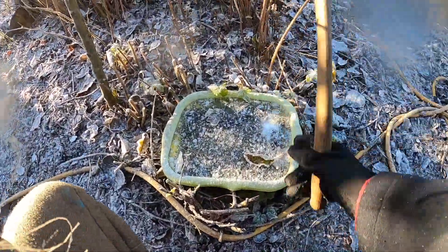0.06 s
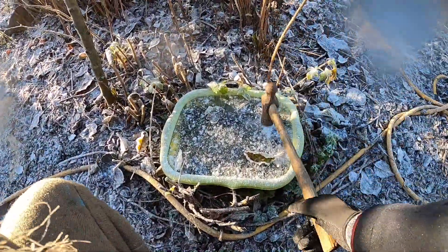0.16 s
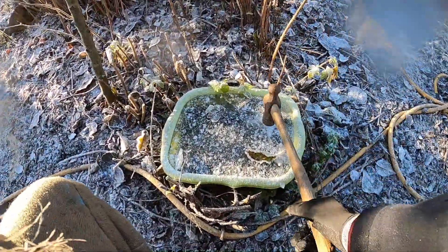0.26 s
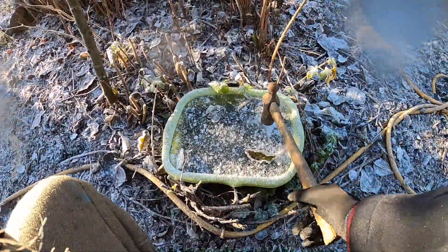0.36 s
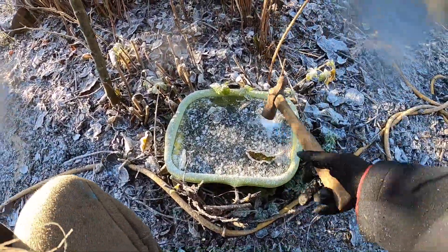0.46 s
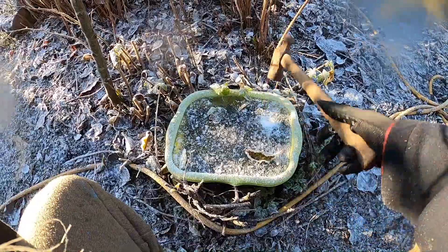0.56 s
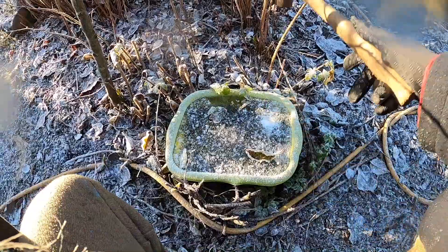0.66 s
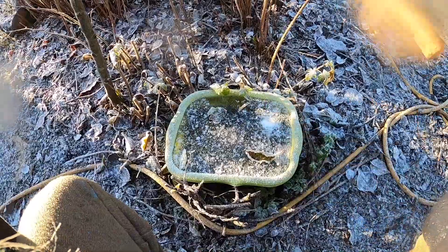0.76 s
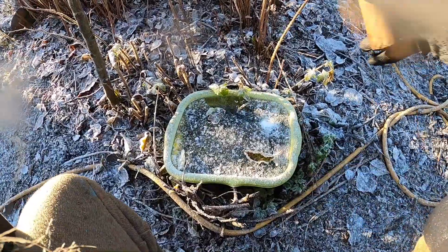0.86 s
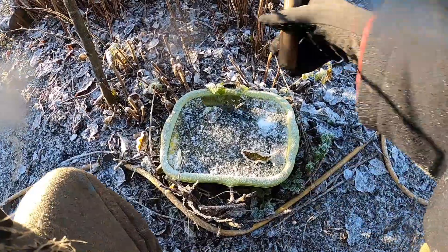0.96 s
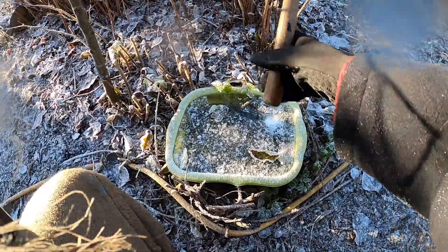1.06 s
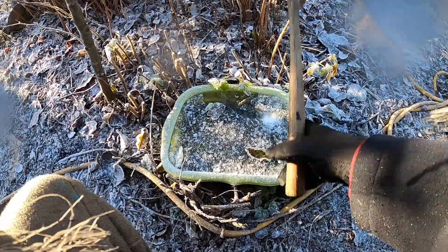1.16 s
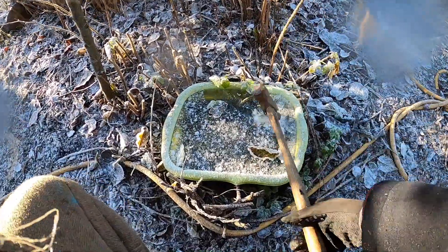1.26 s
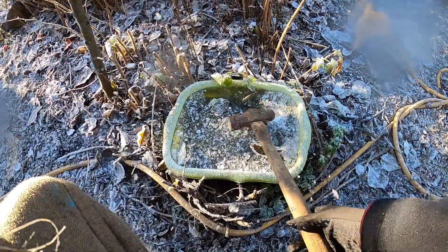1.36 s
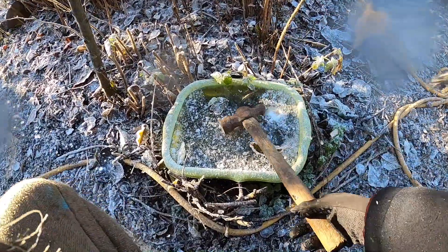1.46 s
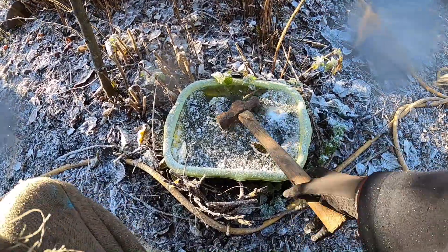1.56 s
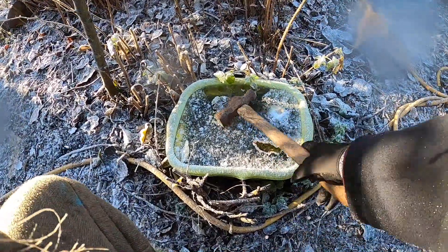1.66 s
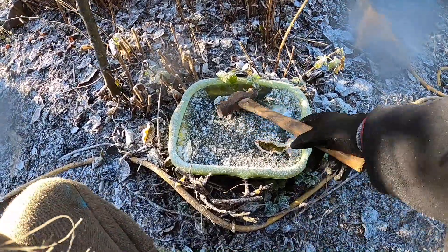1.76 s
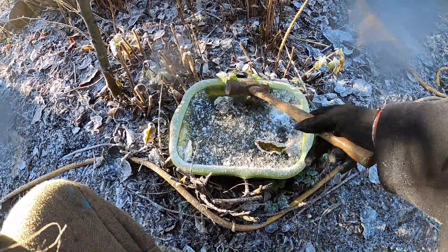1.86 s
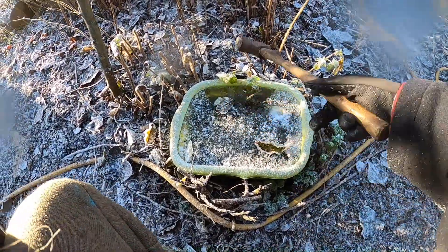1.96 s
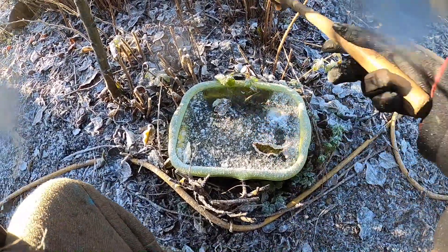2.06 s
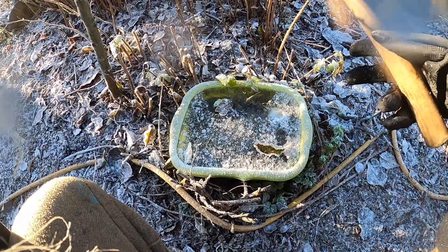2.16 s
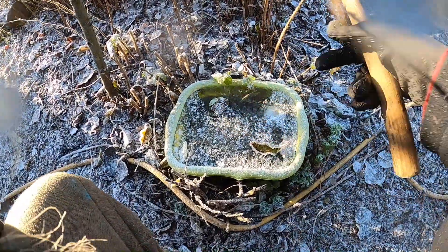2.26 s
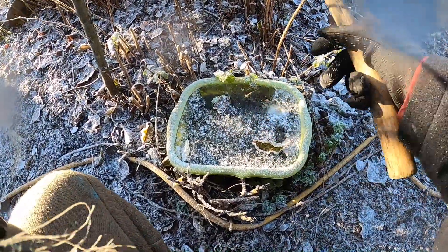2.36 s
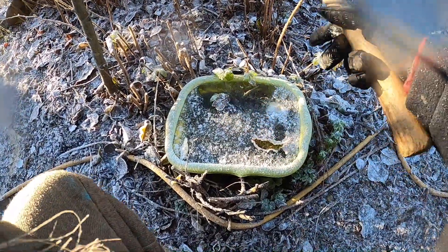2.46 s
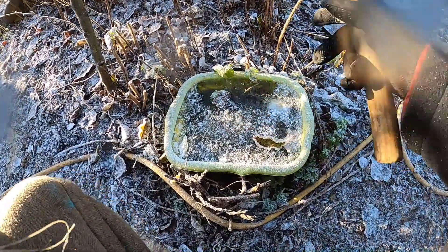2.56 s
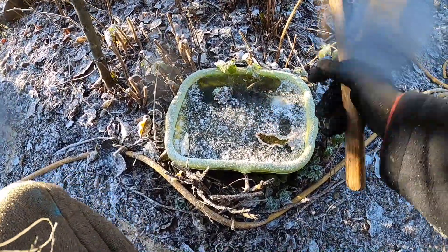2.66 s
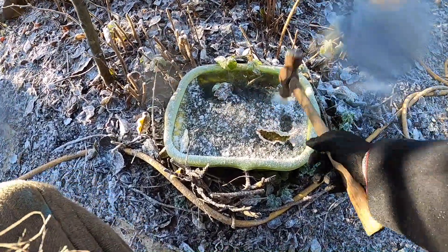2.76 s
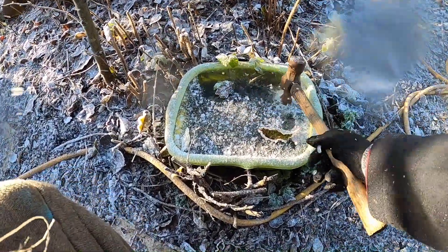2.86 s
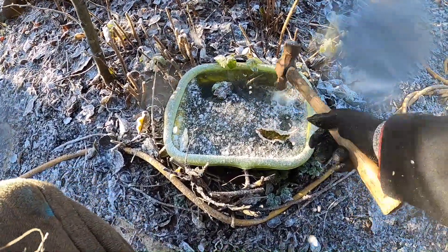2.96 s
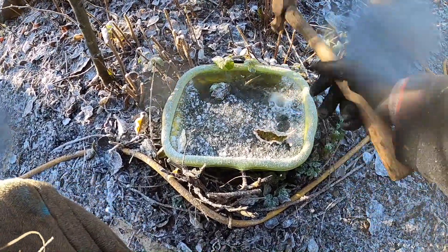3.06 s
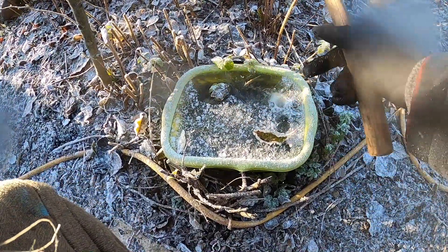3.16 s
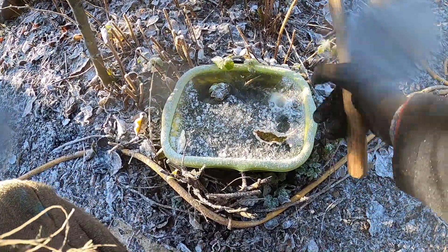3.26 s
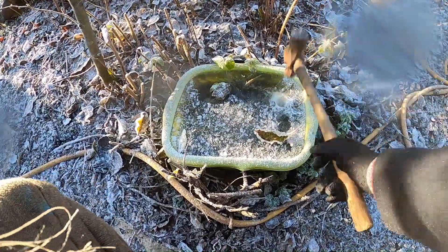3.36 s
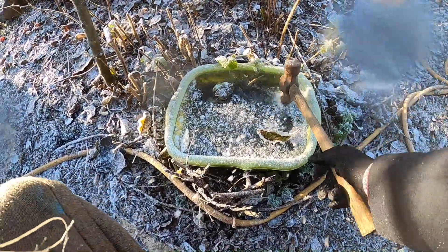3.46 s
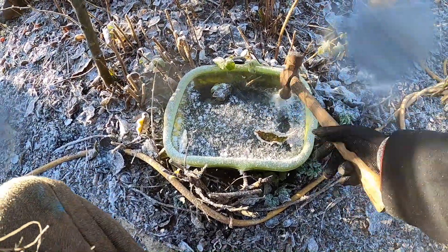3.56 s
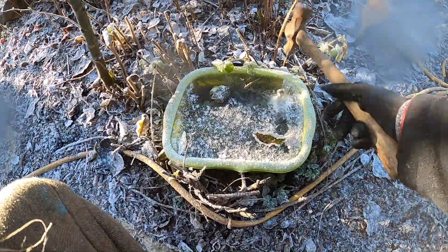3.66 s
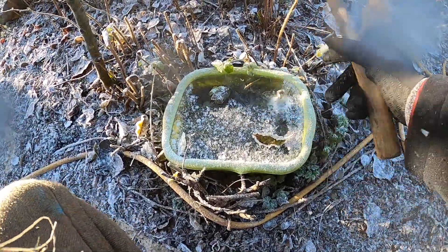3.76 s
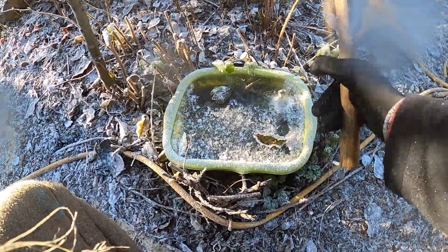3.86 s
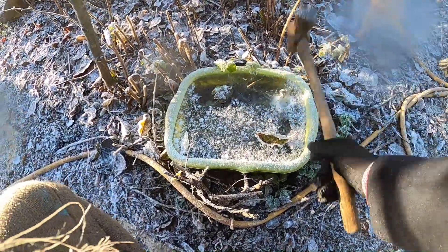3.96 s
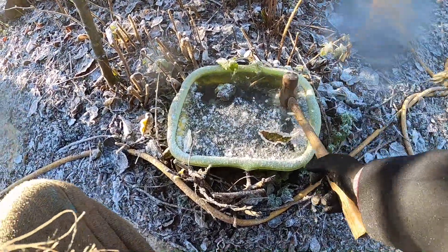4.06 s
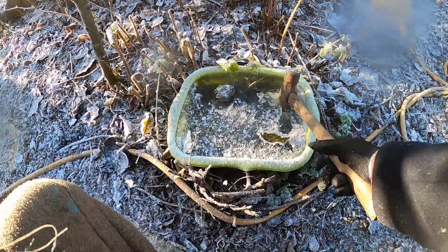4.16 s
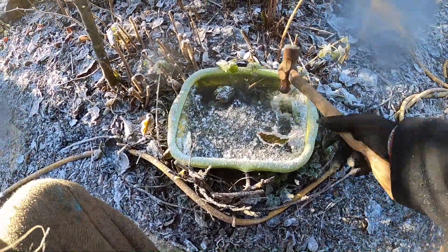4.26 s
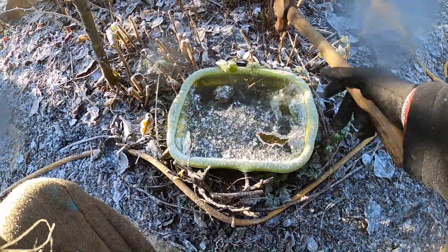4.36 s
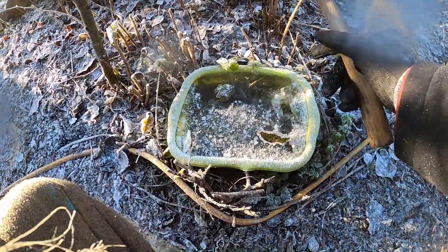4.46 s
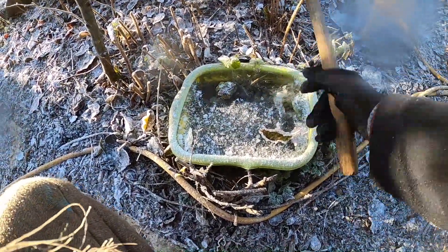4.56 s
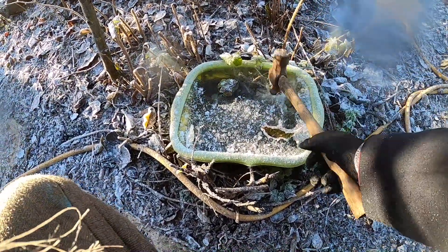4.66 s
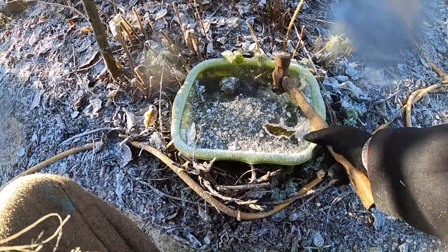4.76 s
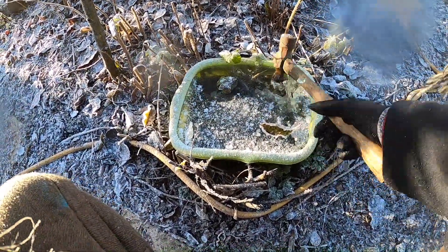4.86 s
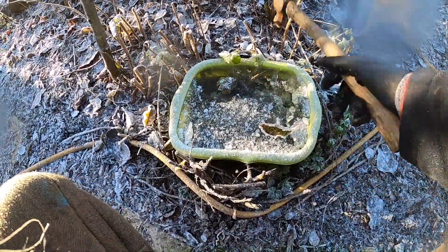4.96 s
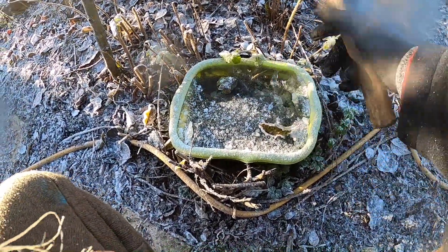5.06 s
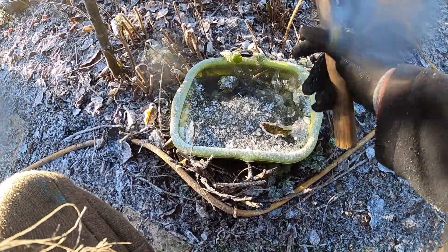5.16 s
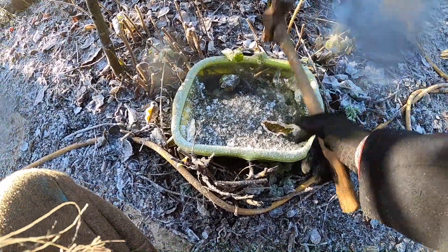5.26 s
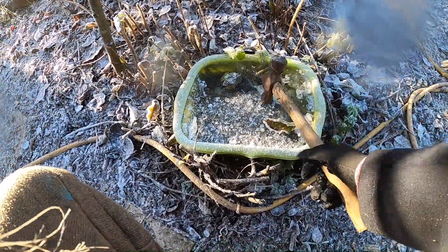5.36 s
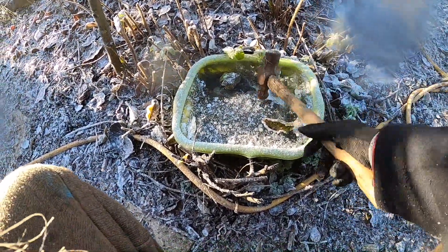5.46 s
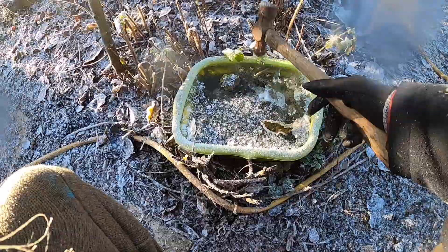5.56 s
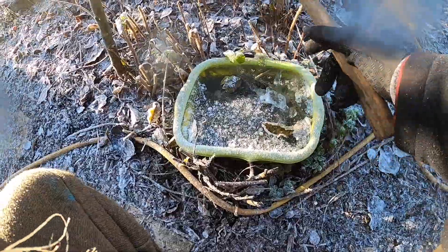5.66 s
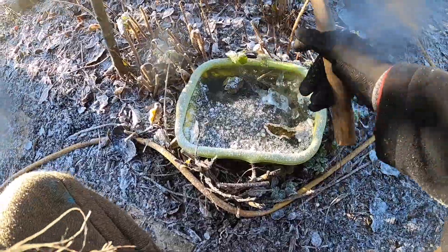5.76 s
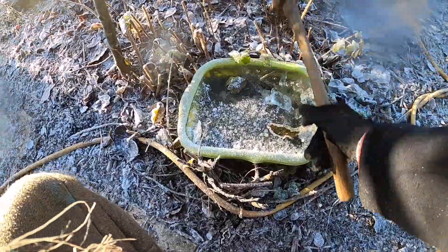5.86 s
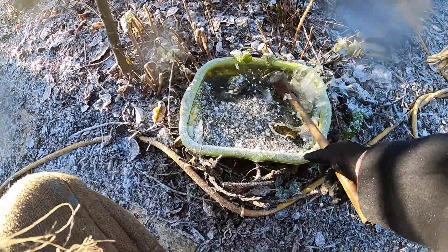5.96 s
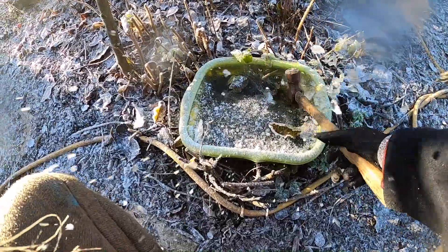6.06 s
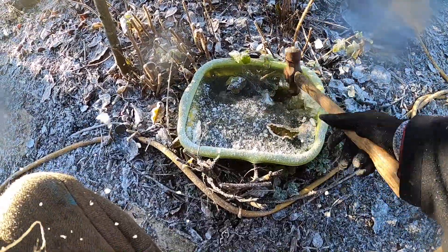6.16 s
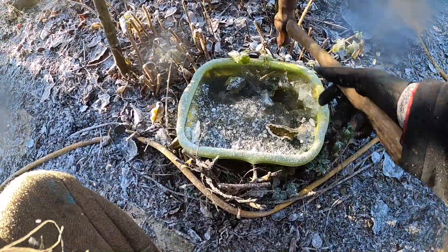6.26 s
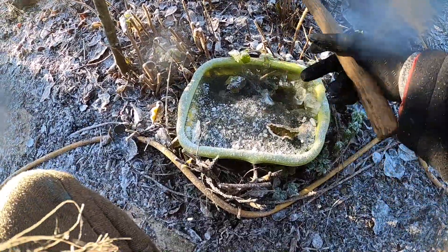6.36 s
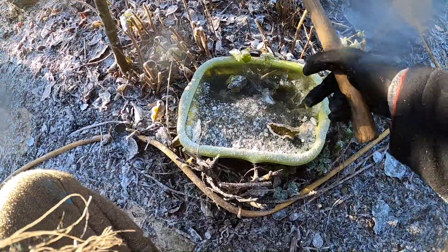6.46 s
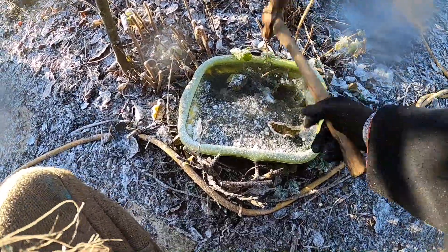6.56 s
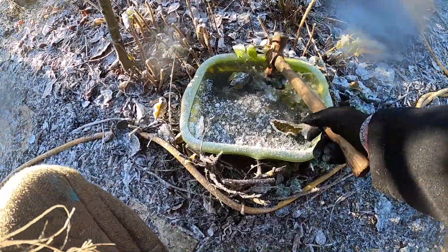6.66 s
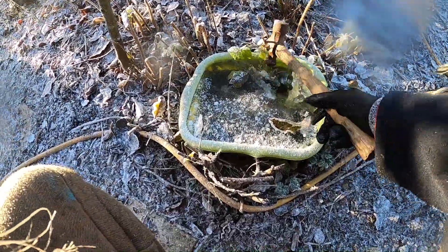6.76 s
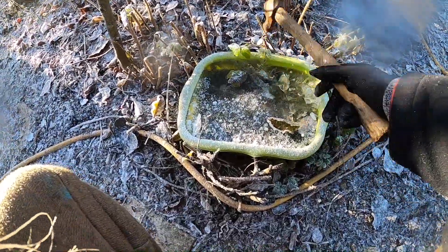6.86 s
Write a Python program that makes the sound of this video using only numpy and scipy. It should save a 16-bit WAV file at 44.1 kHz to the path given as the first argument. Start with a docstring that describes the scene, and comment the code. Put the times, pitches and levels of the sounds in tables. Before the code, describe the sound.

Spaced hammer blows on a frozen bowl give bright cracks and hollow thuds, then the ice breaks wetly amid tinkling shards and low outdoor rumble.

```python
"""Hammer on ice in a plastic bowl

Outdoors, close to a two-port microphone, a hammer strikes a sheet of ice. Each blow is a falling bending
tone, a noisy crack, a shard's ring, loose rattle and the bowl's dying tones. Short rings and clicks make
chips, tone pairs make knocks and ringing ice pieces, gated noise and grains make bursts of ice dust and
shards, slush and quiet smooth rustles, perhaps of a sleeve. One faint squeak bends upward. A far engine,
built from sine waves, hums over filtered noise: a low outdoor wash."""
import sys
import numpy as np
from scipy import signal
from scipy.fft import rfft, irfft, next_fast_len
from scipy.io import wavfile
from scipy.ndimage import uniform_filter1d

SR = 44100
rng = np.random.default_rng(int(sys.argv[2]) if len(sys.argv) > 2 else 0)


def bounce(signal):
    """Save signal as a 16-bit WAV file at the path given by the first command-line argument."""
    frames = np.transpose(np.atleast_2d(signal))
    limited = np.clip(frames, -1, 1)
    pcm = np.round(limited * 32767).astype(np.int16)
    wavfile.write(sys.argv[1], SR, pcm)


N = 304949

# colour of the fizzing noise in chip clicks, crackles and rustles: (frequency [Hz], level [dB])
FIZZ_COLOUR = [(300, -37), (710, -5), (1200, 5.5), (1530, -24), (2240, -1), (4040, 0), (6120, -6.5),
               (7380, -11.5), (8410, -11), (11800, -24), (15300, -52), (16400, -52.5)]


def gain_of(db):
    """Turns decibels into a factor for the wave's size."""
    return 10 ** (np.asarray(db) / 20)


def evened(x):
    """Scales a sound to an average strength (rms) of 1."""
    return x / np.sqrt(np.mean(x ** 2) + 1e-20)


def read(points, hz):
    """Reads a spectrum between its points, on a log pitch axis."""
    f, value = np.transpose(points)
    return np.interp(np.log(hz + 1), np.log(f + 1), value)


def curve(rows):
    """Draws each column of a timed table as a line, sample by sample."""
    s, *columns = np.transpose(rows)
    t = np.arange(N) / SR
    return [np.interp(t, s, column) for column in columns]


def add(mix, s, sound):
    """Lays a sound into the mix, starting at s seconds."""
    part = mix[round(s * SR):][:len(sound)]
    part += sound[:len(part)]


def colour(x, points):
    """Filters a sound by a spectrum in dB."""
    size = next_fast_len(len(x))
    gain = gain_of(read(points, np.fft.rfftfreq(size, 1 / SR)))
    return irfft(rfft(x, size) * gain, size)[:len(x)]


def flicker(span_s):
    """Random wavering of rms 1: noise smoothed twice over a span."""
    size = max(int(span_s * SR), 2)
    smoothed = uniform_filter1d(rng.standard_normal(N), size)
    return evened(uniform_filter1d(smoothed, size))


def ring(modes, t):
    """Adds up the natural tones of a struck body, each dying at its own speed."""
    return sum(gain_of(db - 60 * t / t60) * np.sin(2 * np.pi * hz * t) for hz, db, t60 in modes)


def bursts(rows, shares=1):
    """Loudness of overlapping bursts: quick rise, slanted hold, then one shared speed of dying."""
    rise_s, dies_db_per_s = 0.014, 549
    t = np.arange(N) / SR
    out = np.zeros(N)
    for (s, length, db, change_db), share in zip(rows, shares * np.ones(len(rows))):
        age = np.maximum(t - s, 0)
        slant_db = change_db * np.minimum(age / length, 1)
        fade_db = dies_db_per_s * np.maximum(age - length, 0)
        out += share * np.minimum(age / rise_s, 1) * gain_of(db + slant_db - fade_db)
    return out


def grains(per_s, lo_hz, hi_hz, cycles, spread_db, count):
    """Sparse bursts of a few slightly rising cycles, at scattered pitches and sizes."""
    happens = rng.random(N) < per_s / SR
    size = gain_of(spread_db * np.minimum(rng.exponential(1, N), 4)) * happens
    kind, out = rng.integers(0, count, N), np.zeros(N)
    for k, hz in enumerate(np.geomspace(lo_hz, hi_hz, count)):
        u = np.arange(int(3 * cycles * SR / hz)) * hz / SR  # time counted in cycles
        swell = u * np.exp(-2.5 * u / cycles)
        shape = swell * np.sin(2 * np.pi * u * (1 + u / 250))
        out += signal.oaconvolve(size * (kind == k), shape / np.linalg.norm(shape))[:N]
    return evened(out)


def blow(crack_db, bend_db, t60, boom_db, bowl_db, rattle_db, ring_hz, ring_db):
    """Bending waves arrive high first, low later; a crack and a shard's ring on top, the bowl beneath."""
    # colour of the crack noise: (frequency [Hz], level [dB])
    crack_colour = [(530, -79), (900, -41.5), (1890, -5), (2850, -1), (3380, 1), (4110, -0.5), (5050, -2.5),
                    (8610, -12.5), (9260, -18.5), (14200, -29.5), (16400, -68.5)]
    # colour of loose ice after a blow: (frequency [Hz], level [dB])
    rattle_colour = [(100, -16), (300, 4), (900, -16), (1500, -22.5), (4000, -26.5), (9000, -38.5),
                     (16000, -55)]
    # tones of the bowl: (frequency [Hz], relative level [dB], time to fall 60 dB [s])
    bowl_modes = [(139.4, -1.5, 0.13), (206.5, -10, 0.18), (310, -3, 0.092), (429, -25, 0.14),
                  (1000, 22.5, 0.0096)]
    # bowl on the ground: (frequency [Hz], relative level [dB], time to fall 60 dB [s])
    boom_modes = [(38.46, -18, 0.47), (56, 0.5, 0.065), (93.7, -4.5, 0.096)]
    bend_hz, slide_s, lag_s = 700, 0.002946, 0.0014  # first pitch, slide time, delay
    crack_t60, rattle_t60, shard_t60 = 0.013, 0.08, 0.012  # seconds to fall 60 dB

    t = np.arange(SR // 3) / SR
    late = np.maximum(t - lag_s, 0)  # the sheet gives way just after the first crack
    falling = np.sin(2 * np.pi * bend_hz * slide_s * np.log1p(late / slide_s))
    bend = falling * gain_of(bend_db - 60 * (late / t60) ** 1.34)
    noise = rng.standard_normal((2, len(t)))
    crack = evened(colour(noise[0], crack_colour)) * gain_of(crack_db - 60 * t / crack_t60)
    rattle = evened(colour(noise[1], rattle_colour)) * gain_of(rattle_db - 60 * t / rattle_t60)
    shard = ring([(ring_hz, ring_db, shard_t60)], t)
    bowl = gain_of(boom_db) * ring(boom_modes, t) + gain_of(bowl_db) * ring(bowl_modes, t)

    def rise(s):
        """Ramps up from silence in s seconds."""
        return np.minimum(t / s, 1)

    return bend * rise(0.0005) + (crack + shard) * rise(0.0017) + (rattle - bowl) * rise(0.0035)


def chip(db, hz, click_db):
    """A short ring that rises a little, with a click of wide noise."""
    t60 = 0.014  # seconds to fall 60 dB
    t = np.arange(2000) / SR
    dying = gain_of(-60 * t / t60)
    tone = np.sin(2 * np.pi * hz * t * (1 + 3 * t)) * dying * np.minimum(t / 0.0007, 1)
    noise = evened(colour(rng.standard_normal(len(t)), FIZZ_COLOUR))
    click = noise * gain_of(click_db) * dying * np.minimum(t / 0.0004, 1)
    return gain_of(db) * (tone + click)


def knock_or_ice_ring(db, hz):
    """A knock on the bowl or the steady ring of an ice piece: two tones that die together."""
    t60 = 0.035  # seconds to fall 60 dB
    t = np.arange(4000) / SR
    pair = np.sin(2 * np.pi * hz * t) + 0.32 * np.sin(2 * np.pi * 1.666 * hz * t)
    return gain_of(db - 60 * t / t60) * pair * np.minimum(t / 0.00053, 1)


def squeak(length, from_hz, to_hz, db):
    """A thin, slightly rough tone that swells and bends upward."""
    u = np.arange(0, length, 1 / SR) / length  # 0 at the start, 1 at the end
    roughness = 1 + 0.4 * uniform_filter1d(rng.standard_normal(len(u)), 60)
    hz = (from_hz + (to_hz - from_hz) * u) * roughness
    return gain_of(db) * np.sqrt(u) * np.sin(2 * np.pi * np.cumsum(hz) / SR)


def crackles_and_rustles():
    """Noise gated by many tiny fractures, each favouring one band, with ringing shards; smooth rustles."""
    # bursts of ice dust and shards, and quiet smooth rustles, perhaps of a sleeve: (start [s], length [s],
    # first level [dB], change over the length [dB], smooth share of the power [0-1])
    burst_rows = np.array([(.24, 0.22, -64, 8, 0.34), (0.475, 0.12, -55, -9, 0.7), (0.611, .16, -59, 3, .3),
                           (0.785, .11, -61, 4.5, 0.9), (.98, .1, -59, 1.5, 0.7),
                           (1.197, 0.12, -63, 1, 0.7), (1.341, 0.13, -56.5, 5.5, 1),
                           (1.49, 0.18, -56.5, 4, 0.37), (1.674, 0.3, -47, -14.5, 0.09),
                           (1.969, 0.053, -51, -6, 0), (2.14, 0.042, -55, -0.5, 0.77),
                           (2.24, 0.085, -63, 10.5, 0.97), (2.41, .3, -79, 18.5, 0.2),
                           (2.847, 0.15, -53, -7, 0.5), (3.146, 0.14, -54.5, 0.5, 0.08),
                           (3.293, .08, -60.5, 5.5, 0), (3.441, 0.21, -43, -12.5, 0.01),
                           (3.69, 0.19, -50, 1, 0.14), (4.075, 0.21, -44, -1.5, .8),
                           (4.218, 0.17, -45, -18, 0.9), (4.37, 0.043, -48.5, 2.5, 0.52),
                           (4.428, .08, -65, -4, .6), (4.577, 0.17, -56, -11, 0),
                           (4.712, 0.17, -48.5, -6.5, 0.17), (4.872, 0.088, -52, 1, 0.3),
                           (4.969, .14, -59.5, 0.5, 0.2), (5.159, .1, -61, -23, 0.8),
                           (5.37, .11, -60, 5.5, 0.8), (5.503, .22, -57.5, 0.5, 0.33),
                           (5.74, .1, -69, 0.5, 0.3), (5.979, 0.092, -27, -11.5, 0.66),
                           (6.083, 0.36, -45, 0.5, 0.33), (6.447, 0.17, -52.5, 0.5, 0.4),
                           (6.625, 0.04, -42.5, 7, .7), (6.7, .08, -56, 5.5, 0.05),
                           (6.789, 0.17, -48, 4.5, 0.38)])
    snap_fade_s = 0.0035
    happens = rng.random(N) < 220 * gain_of(4.5 * flicker(0.03)) / SR  # around 220 a second, in clumps
    snaps = gain_of(5.2 * np.minimum(rng.exponential(1, N), 4)) * happens
    noise = evened(colour(rng.standard_normal(N), FIZZ_COLOUR))
    band = rng.integers(0, 3, N)
    crackle = 0.83 * grains(450, 1088, 5215, 3.8, 3.5, count=18)
    for k, edges_hz in enumerate([(1000, 3200), (2600, 6000), (4500, 15000)]):
        favoured = snaps * np.where(band == k, 1, 0.15)
        gate = signal.lfilter([1], [1, -np.exp(-1 / (snap_fade_s * SR))], favoured)
        band_filter = signal.butter(2, edges_hz, "band", fs=SR, output="sos")
        crackle += evened(gate) * signal.sosfilt(band_filter, noise)
    clumps = gain_of(3 * flicker(0.014))
    fine_grains = grains(1800, 1294, 5530, 8.9, 3.6, count=20)
    rustle = evened(clumps * evened(noise + 0.85 * fine_grains))
    timing, smooth = burst_rows[:, :-1], np.clip(burst_rows[:, -1], 0, 1)
    smooth_part = bursts(timing, np.sqrt(smooth)) * rustle
    return smooth_part + bursts(timing, np.sqrt(1 - smooth)) * evened(crackle)


def slosh():
    """Dense bubbles and bumps of slush during each surge."""
    # surges of water and slush: (start [s], length [s], first level [dB], change over the length [dB])
    surges = [(1.36, 0.076, -47, 9), (1.48, 0.076, -53, 7), (4.085, 0.14, -35, -16.5),
              (4.24, 0.041, -37, -5), (4.32, 0.08, -51, 10.5), (4.745, 0.034, -32.5, -14),
              (5.988, 0.081, -23, -6.5), (6.09, 0.17, -44.5, 0), (6.78, 0.11, -46, -0.5)]
    bubbles = grains(1500, 264.0, 3440, 3.95, 3.16, count=14)
    return bursts(surges) * gain_of(2.6 * flicker(0.0027)) * bubbles


def engine():
    """Multiples of a far engine's firing rate, each wavering in level, with a slight shared phase wobble."""
    # engine: (time [s], firing rate [Hz], level [dB], extra level of multiples 5 to 8 [dB])
    engine_rows = [(0, 61.1, -65.5, 12), (1.2, 63.86, -45, -1), (2, 64.07, -45.5, 6.5),
                   (2.7, 66, -43.5, -5.5), (3.4, 67.35, -43.5, -13.5), (4, 68.63, -44, -4),
                   (4.6, 68.75, -52.5, -9.5), (5.2, 70.04, -50, 8), (5.8, 70.57, -48, -2.5),
                   (6.91, 70.47, -54.5, 15)]
    # multiples 1 to 8 of the firing rate: relative level [dB]
    order_db = [-7.5, -2, -11, -13.5, -19, -17, -17, -23]
    hz, db, upper_db = curve(engine_rows)
    turns = np.cumsum(hz) / SR + 0.01 * flicker(0.026)
    hum = np.zeros(N)
    for k, own_db in enumerate(order_db):
        level = gain_of(db + own_db + (k > 3) * upper_db + 2.1 * flicker(0.24))
        hum += level * np.sin(2 * np.pi * ((k + 1) * turns + rng.random()))
    return hum * np.sqrt(2)  # a sine of peak root 2 has rms 1


def wash():
    """Outdoor noise: lumpy rumble under a steadier bed."""
    # colour of the wash: (frequency [Hz], level [dB])
    wash_colour = [(12, -35), (20, 11.5), (48, 6.5), (128, 0), (243, -6), (392, -19), (477, -12.5),
                   (687, -14), (936, -12), (1840, -30.5), (3500, -36.5), (3810, -33), (6490, -38.5),
                   (12400, -52.5), (16400, -87)]
    # level of the wash before its wavering: (time [s], level [dB])
    wash_level = [(0, -45.5), (1.5, -41), (3.5, -42), (5.5, -44), (6.91, -42)]
    noise = evened(colour(rng.standard_normal(N), wash_colour))
    rumble = signal.sosfiltfilt(signal.butter(2, 300, fs=SR, output="sos"), noise)
    lumpy = gain_of(2.2 * flicker(0.1)) * rumble
    steadier = gain_of(1.5 * flicker(0.1)) * (noise - rumble)
    return gain_of(curve(wash_level)[0]) * (lumpy + steadier)


def ports(x):
    """Two microphone ports: phase lead, balance and a scattered part that drifts."""
    # how far the left port leads: (frequency [Hz], phase [radians])
    lead = [(0, 0), (1400, -.75), (3000, -.9), (6000, -1.75), (10000, -2.1), (16000, -2.1)]
    # balance: (frequency [Hz], left minus right [dB])
    sides = [(60, .5), (300, .2), (1400, -2.3), (3000, -.4), (6000, -.6), (10000, -4), (15000, -5.5)]
    # scattered part, opposite in the two ports: (frequency [Hz], level [dB])
    wide = [(60, -24), (300, -17.5), (700, -10), (2000, -9.5), (5000, -13), (11000, -12)]
    size = next_fast_len(N)
    hz = np.fft.rfftfreq(size, 1 / SR)
    phase = np.interp(hz, *np.transpose(lead))
    tilt = gain_of(read(sides, hz) / 2) * np.exp(0.5j * phase)  # half the difference to each port
    echoes = rng.standard_normal((2, 600)) * gain_of(-60 * np.arange(600) / SR / 0.011)
    turn = 1.56 * flicker(0.18)  # moving hands change the paths
    side = np.zeros(N)
    for weight, echo in zip((np.cos(turn), np.sin(turn)), echoes):
        side += weight * signal.oaconvolve(x, echo / np.linalg.norm(echo))[:N]
    side = colour(side, wide)
    pair = np.array([tilt, 1 / tilt])
    direct = irfft(pair / abs(pair.mean(0)) * rfft(x, size), size)[:, :N]
    return direct + [side, -side]


def scene():
    """Plays every source and hears the mix through the ports."""
    # blows: (time [s], crack level [dB], bending level [dB], bending time to fall 60 dB [s], ground boom [dB],
    # bowl ring [dB], rattle [dB], shard ring [Hz], shard level [dB])
    blow_rows = [(0.2289, -11, -4, 0.023, -11.5, -18.5, -22.5, 5080, -8.5),
                 (1.3155, -15.5, -6, 0.022, -10.5, -23.5, -19.5, 1820, -13),
                 (1.4265, -52, -8.5, .026, -25, -24, -29, 1500, -14.5),
                 (2.836, -10, -9.5, 0.042, -9, -22, -16.5, 2345, -12),
                 (3.4438, -10, -9, 0.022, -10, -26, -12.5, 2280, -8),
                 (4.0672, -12, -5.5, 0.032, -12.5, -25.5, -13.5, 3110, -9.5),
                 (4.7264, -9.5, -13.5, 0.044, -11.5, -18.5, -11.5, 1600, -7),
                 (5.3684, -5.5, -11.5, .04, -12.5, -17.5, -24.5, 3240, -4.5),
                 (5.9858, -7, -18, 0.094, -21.5, -29, -42, 3100, -12),
                 (6.6685, -12, -5, 0.0098, -12, -18, -20, 2028, -8)]
    # chips ticking, drops and first touches of the hammer:
    # (time [s], ring level [dB], starting ring pitch [Hz], click level relative to the ring [dB])
    chip_rows = [(.1845, -56, 3280, 15), (.22, -40, 5250, 9), (.265, -42, 3200, -11),
                 (.305, -37.5, 2800, -7), (.3676, -36, 2770, -7), (.393, -36.5, 2250, 2),
                 (.4767, -34.5, 6000, -3), (.5159, -35, 1230, -4.5), (.5883, -38.5, 5900, -5),
                 (.6265, -41, 4040, 3.5), (.6833, -46, 2610, 10), (.704, -36, 4800, -3),
                 (.133, -54, 6000, -8), (.544, -51.5, 5340, 10), (.654, -50, 3500, 12.5),
                 (.7663, -37.5, 2640, -7), (.986, -43, 4300, -2), (1.0096, -29, 6400, -7),
                 (1.3917, -22, 1320, -12), (1.443, -32, 2460, -13), (1.509, -17.5, 4390, -9),
                 (1.5445, -41.5, 1680, 6), (1.5928, -37, 2600, 0), (1.625, -36, 4900, -1),
                 (1.6763, -18.5, 1930, -7), (1.691, -33, 3470, -11), (1.7149, -42, 1740, -2),
                 (1.7426, -36, 1850, -5), (1.92, -44, 5004, 1), (1.9946, -47, 1430, 6.5),
                 (2.0988, -45, 2380, 4), (2.885, -31.5, 3440, -8), (2.9635, -26, 3030, -14),
                 (3.1097, -46.5, 3900, 6), (3.217, -29, 1290, -7.5), (3.2964, -20.5, 1680, -4),
                 (3.477, -22, 3120, -7), (3.5963, -25, 2680, 4), (3.709, -38, 4900, 3.5),
                 (3.7366, -40.5, 3200, 9), (3.7566, -25, 3620, -9), (3.8237, -35, 4460, -2),
                 (4.059, -42.5, 2860, 11), (4.1275, -21.5, 2700, -12), (4.2328, -19.5, 2529, -22),
                 (4.3314, -19.5, 1300, -37), (4.3923, -25, 2210, -14), (4.4179, -31, 3220, -11),
                 (4.4842, -43.5, 4280, 1), (4.579, -42.5, 3490, -3), (4.6586, -37, 5200, -10),
                 (4.6967, -50.5, 1616, 15), (4.8908, -30, 2380, -2.5), (4.9294, -29, 3240, -28),
                 (5.1521, -57.5, 1300, 15), (5.3582, -38, 3330, 4), (5.456, -35.5, 3340, -11),
                 (5.6174, -39, 4250, -0.5), (5.7394, -45.5, 1640, -3), (6.026, -12.5, 3160, -8),
                 (6.136, -25, 2180, -29), (6.1696, -25.5, 1317, -7), (6.218, -23, 2250, -7),
                 (6.2569, -32.5, 2530, 11.5), (6.3134, -28.5, 4120, -4.5), (6.4327, -26, 1435, -10),
                 (6.4923, -26, 1638, -32), (6.5291, -36.5, 2410, 0), (6.541, -35.5, 4300, -0.5),
                 (6.652, -28, 2900, -1), (6.6652, -13.5, 2548, -5.5), (6.785, -26.5, 2793, -21),
                 (6.8578, -22.5, 3300, -25)]
    # knocks on the bowl and steady rings of ice pieces: (time [s], level [dB], lower tone [Hz])
    tone_pair_rows = [(.254, -21.5, 252), (.513, -33, 544), (1.233, -36.5, 275), (1.319, -31, 1890),
                      (1.43, -33, 2600), (1.594, -35, 2560), (1.362, -26.5, 606), (1.394, -21, 407),
                      (1.443, -16.5, 416), (1.484, -24, 348), (1.676, -23, 946), (1.736, -26.5, 430),
                      (2.877, -28, 530), (3.512, -21.5, 362), (3.862, -32.5, 636), (4.085, -17, 433),
                      (4.138, -26.5, 550), (4.248, -32, 470), (4.262, -32, 1080), (4.28, -27.5, 1144),
                      (4.295, -27.5, 1110), (4.392, -28.5, 1150), (4.747, -25, 424), (5.9995, -12, 422),
                      (6.048, -25, 417), (6.06, -20.5, 1086), (6.069, -19.5, 700)]
    # a faint rising squeak before the break: (start [s], length [s], from [Hz], to [Hz], level [dB])
    squeak_row = (5.93, .052, 2250, 3150, -59)
    mix = np.zeros(N)
    sources = ((blow_rows, blow), (chip_rows, chip), (tone_pair_rows, knock_or_ice_ring),
               ([squeak_row], squeak))
    for rows, play in sources:
        for s, *settings in rows:
            add(mix, s, play(*settings))
    return ports(mix + crackles_and_rustles() + slosh() + engine() + wash())


def record(dry):
    """Bass roll-off, hard ceiling, then a cut of the highest treble."""
    thin = signal.sosfilt(signal.butter(2, 28, "high", fs=SR, output="sos"), dry)
    treble_cut = signal.firwin(511, 16400, window=("kaiser", 9), fs=SR)  # edge at 16400 Hz
    return signal.oaconvolve(np.clip(thin, -1, 1), treble_cut[None], "same")


dry = scene()
out = record(dry)
bounce(out)
```